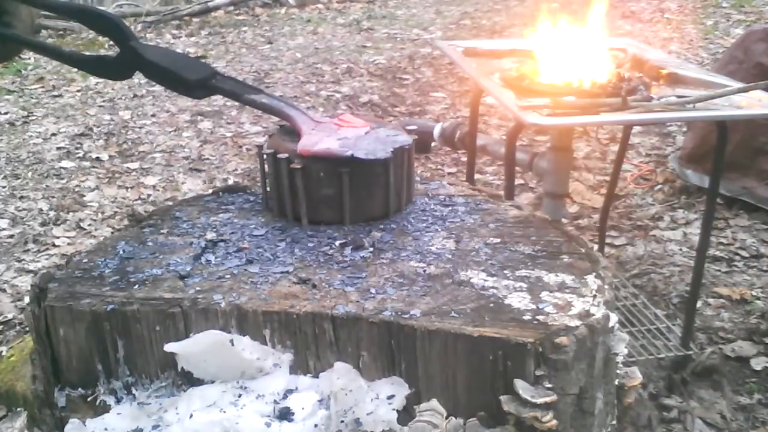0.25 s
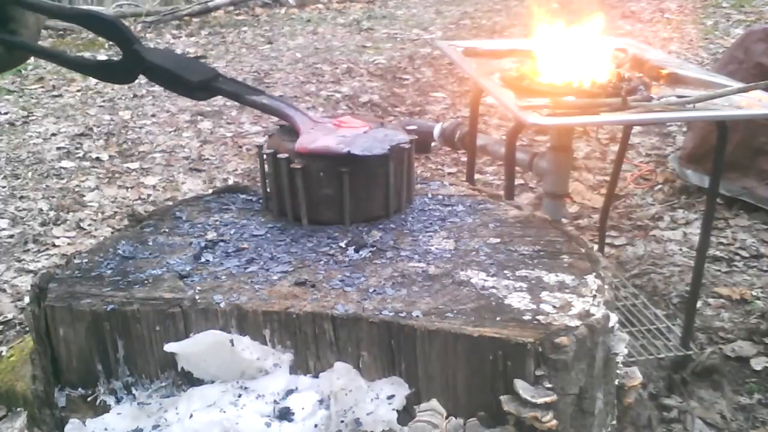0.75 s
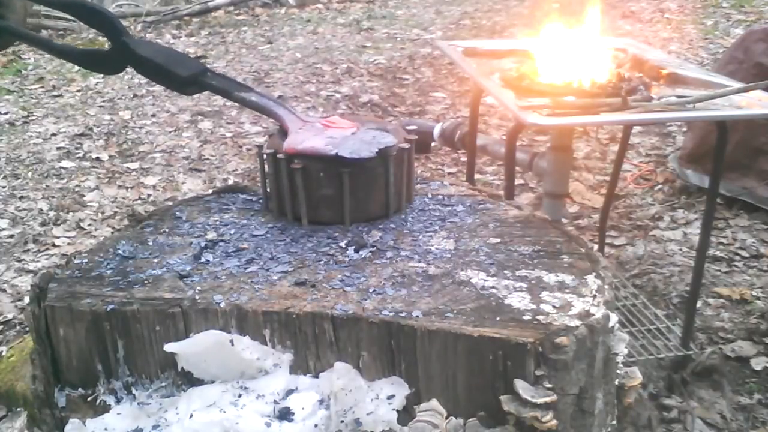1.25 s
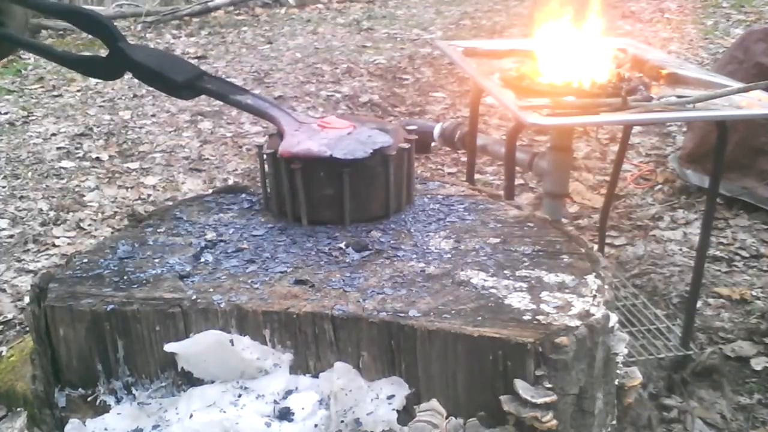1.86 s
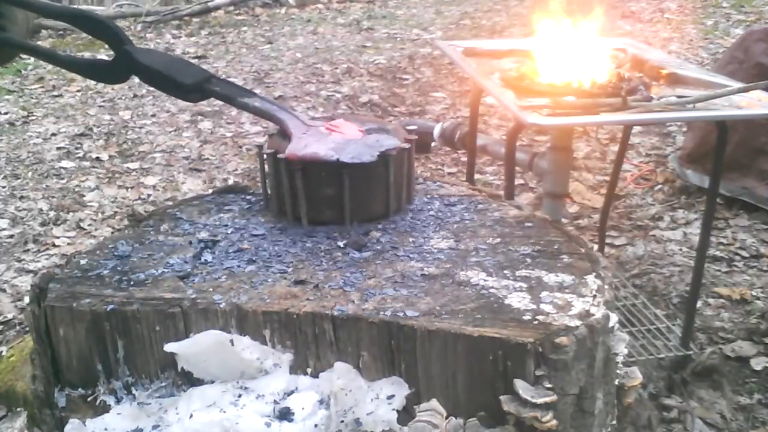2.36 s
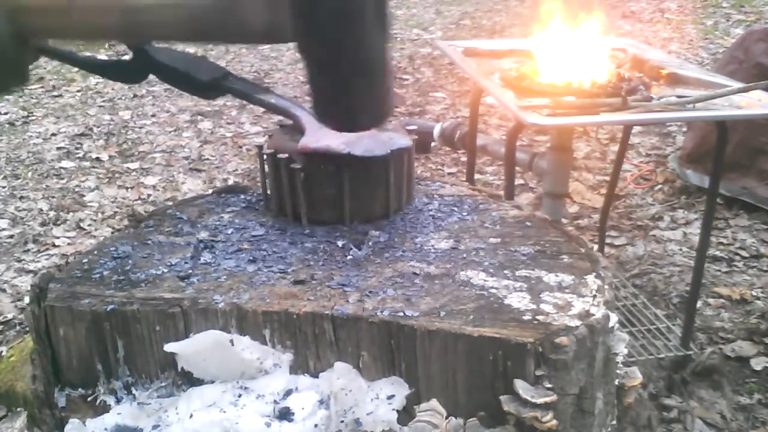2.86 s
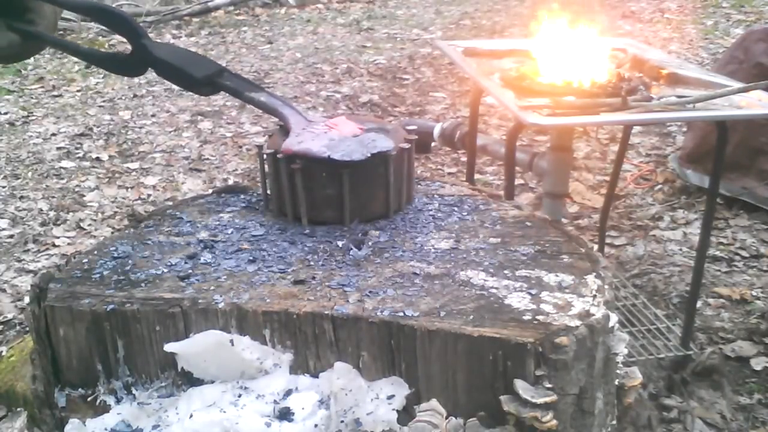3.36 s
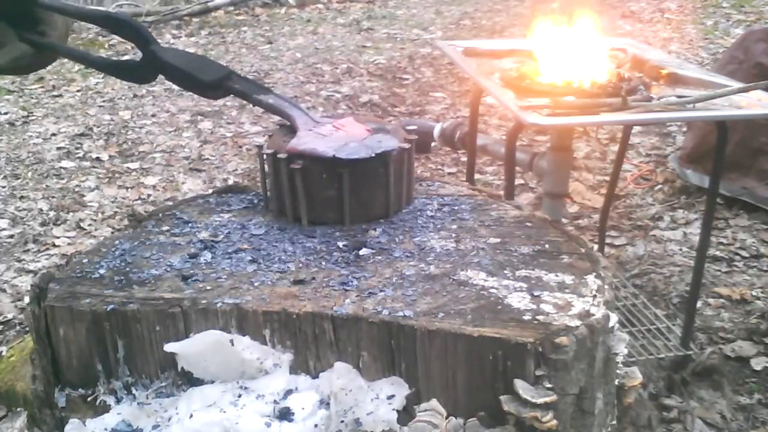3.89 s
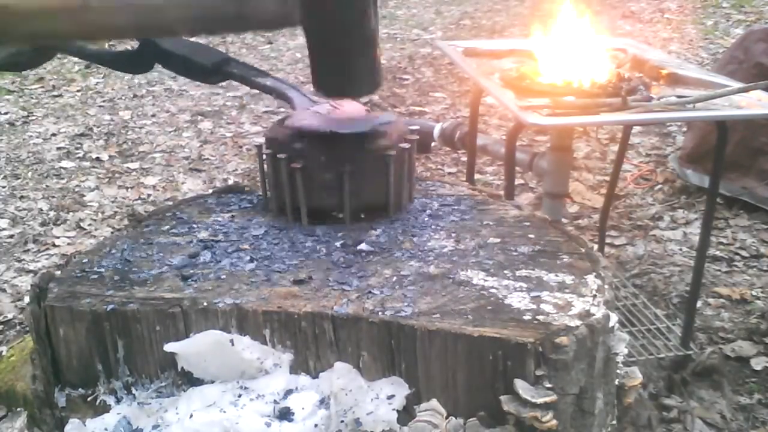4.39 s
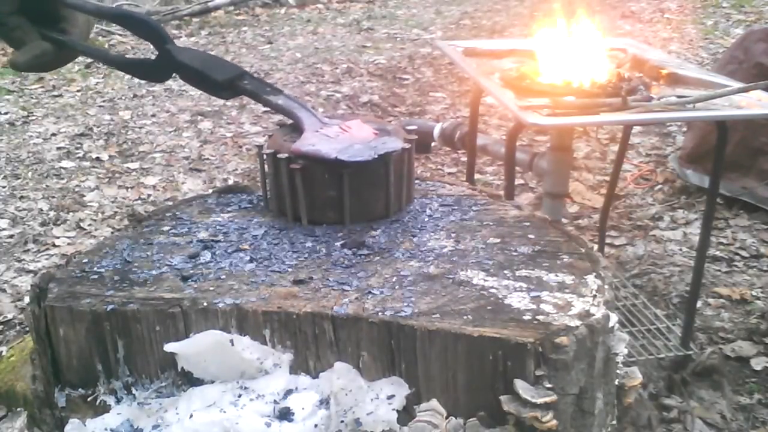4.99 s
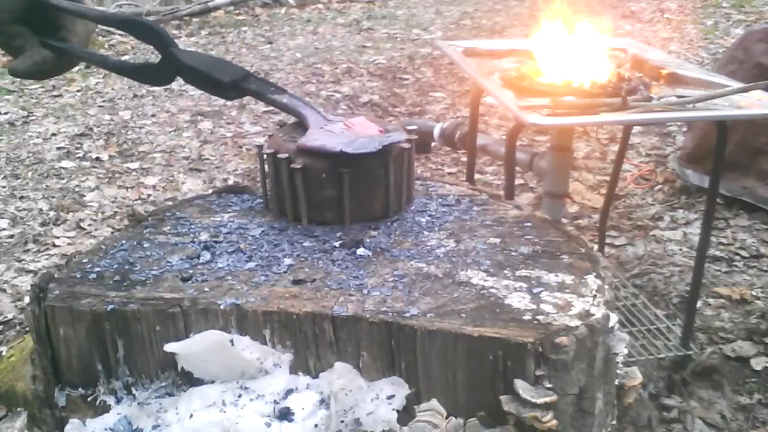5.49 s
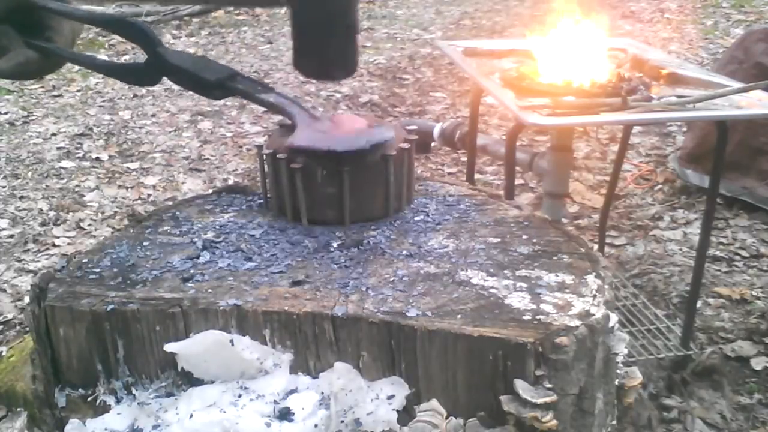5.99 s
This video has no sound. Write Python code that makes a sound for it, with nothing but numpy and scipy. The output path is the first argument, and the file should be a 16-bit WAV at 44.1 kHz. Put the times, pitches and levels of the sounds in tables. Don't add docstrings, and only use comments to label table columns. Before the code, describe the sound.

Outdoors in woodland, close microphones catch the fading end of one hammer blow, then eight more at about three-quarter-second intervals. Each is a short, clipped crash of steel and wood with a thin high ring from the hammer head and a quick scattered echo from trees. Tongs and work knock and clink between blows. A soft forge fire roars steadily, popping, with a faint blower hum.

```python
import sys
import numpy as np
from scipy import signal
from scipy.fft import rfft, irfft
from scipy.io import wavfile
from scipy.ndimage import uniform_filter1d, minimum_filter1d, map_coordinates

SR = 44100
rng = np.random.default_rng(int(sys.argv[2]) if len(sys.argv) > 2 else 0)


def elevation(decibels):
    levels = np.asarray(decibels, float)
    return 10 ** (levels / 20)


def master_out(mix):
    frames = np.transpose(np.atleast_2d(mix))
    ceiling = np.clip(frames, -1, 1)
    pcm = np.round(ceiling * 32767).astype(np.int16)
    wavfile.write(sys.argv[1], SR, pcm)


N = 275184
LEAD = SR // 10

# start in seconds, strength in dB, stump share in dB,
# crash in dB, echo in dB.
BLOW_BEFORE = [
    (-0.036, 2.5, 12, 5, -27.5),
]
BLOWS = [
    (0.59, 7, 4, -1, -26),
    (1.351, 12.4, 1, -3, -21.5),
    (2.098, 12.4, 1, 0, -21),
    (2.856, 12.9, -1.5, 0.5, -18),
    (3.642, 10.9, -3, 0.5, -18),
    (4.415, 14.6, -3.5, -1, -16),
    (5.209, 18.1, -14.5, -2.5, -16),
    (6.006, 13.9, -3.5, -3, -16.5),
]
# lower ring in dB, broad pair in dB, top ring in dB.
HEAD_LEVELS = [(-30, -36, -32), (-43, -42, -27), (-22, -42, -19), (-39, -28, -54), (-33, -17, -9),
               (-10.5, -19, 3), (-25, -39, -25), (-11, -38, -4), (-48, -20, -8)]
# left level in dB, right level in dB, then the seconds
HEAD_TONES = [(-26.5, -33, 0.15, 0.16), (-44, -51, .14, 0.16), (-27.5, -29, 0.13, 0.035),
              (-17.5, -31, 0.15, 0.29), (-19, -21.5, 0.16, 0.19), (-11, -19.5, 0.16, 0.029),
              (-11, -28, 0.16, 0.11), (-10, -20.5, 0.17, 0.16), (-27, -40, 0.184, 0.23)]
# pitch in Hz, t60 in seconds, right-hand gain, right-hand lag in radians.
HEAD_MODES = [(10070, .17, .6, .5), (12300, .2, .9, 2), (12600, .2, .9, 2), (14125, .14, 1.7, 2.2)]
HEAD_FADE = [134, 90]
# pitch in Hz, level in dB, t60 in seconds.
STUMP_MODES = [(94.7, -24.5, 0.22), (148, -19, 0.15), (256.7, -12, 0.12), (473.4, 3.5, 0.044),
               (581, 3.5, 0.053), (647.5, 3, 0.054)]
# pitch in Hz, level in dB, t60 in seconds.
STEEL_MODES = [(795, -1, 0.034), (983.4, 10, 0.033), (1077, 3, 0.029), (1280, 6, 0.024),
               (1771, -3.5, 0.047), (2011, -0.5, 0.057), (2150, -19.5, 0.15), (3138, -1.5, 0.065),
               (3205, -12, 0.097), (3473, -8.5, 0.075), (5105, -3, 0.038)]
# frequency in Hz, density in dB per Hz.
CRASH_COLOUR = [(30, -43), (120, -31), (300, -1), (600, -4), (1000, 2), (1600, -8.5), (2000, 0.5),
                (2500, -8.5), (3400, -5.5), (8000, -24.5), (14300, -23), (15000, -60.5), (22000, -82)]
# frequency in Hz, t60 in seconds.
CRASH_T60 = [(60, 0.13), (250, 0.058), (600, 0.071), (1200, 0.053), (2500, 0.06), (4000, 0.06),
             (14000, 0.09)]
# frequency in Hz, density in dB per Hz.
TREES_COLOUR = [(60, -31), (120, -4.5), (500, -3), (1500, -11), (2000, -11.5), (3500, -11), (8000, -10),
                (13000, -31), (14500, -20), (15000, -88)]
# frequency in Hz, t60 in seconds.
TREES_T60 = [(200, 0.55), (600, 0.53), (1500, 0.65), (2030, 0.96), (2600, 0.73), (3350, 0.73), (4500, 0.63),
             (10000, 0.32)]
# pitch in Hz, width in Hz, level in dB.
ECHO_RESONANCES = [(477, 120, 5), (1120, 240, 5.5), (1930, 200, 6.5), (3320, 450, 7.5), (3930, 250, -16),
                   (5000, 280, 1)]
# frequency in Hz, left-right likeness from -1 to 1.
ALIKE_NEAR = [(100, 1), (1000, 0.22), (3000, 0.098), (10000, 0.041)]
# frequency in Hz, left-right likeness from -1 to 1.
ALIKE_FAR = [(60, 0.97), (180, 0.92), (550, 0.81), (1650, 0.056), (4970, -0.12), (15000, -0.026)]
# frequency in Hz, density in dB per Hz.
FIRE_COLOUR = [(15, -98), (25, -40), (99, -10), (289, -9.5), (330, -4), (432, -7.5), (494, -6.5), (917, -9),
               (1110, -13.5), (1270, -14.5), (1490, -16), (3160, -26.5), (13100, -39), (15400, -29.5)]
# pitch in Hz, wander in Hz, level in dB.
BLOWER_TONES = [(302, 11.46, -66.5), (509, 5.6, -55), (1101, 2.75, -55.5)]
# start in seconds, peak in dB, pitch in Hz, left-right balance in dB.
POPS = [(0.1373, -29, 3520, 4), (0.2647, -33.5, 4470, -4), (0.3087, -41, 2520, -5), (0.93, -34, 4700, -7),
        (1.0191, -37, 2400, -8), (1.1792, -48, 2300, -4), (1.2034, -26.5, 2930, -4), (1.281, -41, 2390, -1),
        (1.3244, -52, 2790, -5.5), (1.586, -39, 10900, -4), (4.318, -38, 4530, -2), (1.846, -42, 4100, -7),
        (1.9035, -36, 2900, -3), (2.3344, -38, 11000, 0), (2.653, -36.5, 3500, 0),
        (2.7057, -40.5, 3420, -1), (2.733, -36, 2430, 1), (2.811, -40, 6500, 0), (3.2884, -39, 2750, 5),
        (3.3857, -37, 4530, -4), (3.9615, -35, 3180, 0), (4.15, -42, 6500, 4), (4.239, -40, 7500, 0),
        (4.3048, -20, 1900, 3), (4.339, -37, 3000, 3), (4.366, -44, 3700, -6), (4.8718, -39, 2300, 5),
        (5.1532, -35.5, 4100, -3), (5.6733, -38, 3320, -0.5), (5.837, -32.5, 3610, -3)]
# start in seconds, peak in dB, pitch in Hz.
KNOCKS = [(0.645, -19, 485), (0.759, -25, 380), (1.404, -11, 487), (1.447, -10.5, 484), (1.49, -25, 710),
          (2.149, -18, 490), (2.169, -17.5, 970), (2.909, -10.5, 493), (3.694, -25, 480), (3.719, -36, 503),
          (5.284, -14, 345), (6.081, -8.5, 450), (6.099, -18, 925)]
# start in seconds, peak in dB, pitch in Hz.
THUDS = [
    (3.752, -30, 125),
    (4.497, -24.5, 141),
    (5.285, -29, 148),
    (6.129, -25, 140),
]
# start in seconds, peak in dB, pitch in Hz.
CLINKS = [
    (.638, -21, 5000),
    (1.449, -21, 3820),
    (2.9134, -9.5, 1500),
    (2.915, -14, 3900),
    (3.775, -34, 3080),
    (4.4687, -8, 4800),
    (4.4946, -11, 3700),
    (5.256, -7.5, 5500),
    (5.423, -30.5, 4870),
    (6.0693, -4.5, 3930),
]
# start in seconds, peak in dB, first pitch in Hz,
# last pitch in Hz, length in seconds.
SLIDE = (1.43, -23.5, 1350, 480, .024)


def unit(x):
    return x / np.sqrt(np.mean(x ** 2) + 1e-20)


def along(points, hz):
    f, v = np.transpose(points)
    return np.interp(np.log(hz + 1), np.log(f + 1), v)


def wobble(rate, size=N):
    knots = rng.standard_normal(int(size * rate / SR) + 4)
    return map_coordinates(knots, [np.arange(size) * rate / SR])


def noise(size, gain, alike, t60=None, patchy_db=0):
    hz, t, z = signal.stft(rng.standard_normal((2, size)), SR, nperseg=256)
    patches = uniform_filter1d(rng.standard_normal(z.shape[1:]), size=4, axis=0)
    patches = uniform_filter1d(patches, size=5, axis=1)
    pair = signal.istft(z * elevation(patchy_db * unit(patches)), SR, nperseg=256)[1][:, :size]
    f = np.fft.rfftfreq(size, 1 / SR)
    turn = np.arccos(np.clip(along(alike, f), -1, 1)) / 2
    mid, side = irfft(rfft(pair) * gain(f) * [np.cos(turn), np.sin(turn)], size)
    pair = unit(np.array([mid + side, mid - side]))
    if t60:
        z = signal.stft(pair, SR, nperseg=256)[2]
        decay = elevation(-60 * t / along(t60, hz)[:, None])
        pair = signal.istft(z * decay, SR, nperseg=256)[1][:, :size]
    return pair


def add(track, s, sound):
    part = track[:, LEAD + round(s * SR):][:, :sound.shape[1]]
    part += sound[:, :part.shape[1]]


def ringing(modes, t, turn):
    scatter_db, detune = 1.2, 0.007
    total = 0
    for hz, db, t60 in modes:
        strength, pitch, phase = rng.standard_normal(), rng.standard_normal(), rng.standard_normal((2, 1))
        level = elevation(db + scatter_db * strength - 60 * t / t60)
        total = total + level * np.sin(2 * np.pi * hz * (1 + detune * pitch) * t + turn * phase)
    return total


def head_rings(levels, t):
    lower_db, broad_db, top_db = levels
    drift = 0.47 * np.cumsum(rng.standard_normal((len(HEAD_MODES), len(t))), axis=1) / np.sqrt(SR / 20)
    ring = 0
    for (hz, t60, right, lag), db, d in zip(HEAD_MODES, [lower_db, broad_db, broad_db, top_db], drift):
        wave = np.sin(2 * np.pi * hz * t + d - [[0], [lag]])
        ring = ring + elevation(db - 60 * t / t60) * [[1], [right]] * wave
    return ring * elevation(2 * wobble(50, size=len(t))) * (1 - np.exp(-t / 0.0019))


def head_tone(row, t):
    lift_s, top_s = 0.3, 0.29
    db, dip_s = np.reshape(row, (2, 2, 1))
    fringe_s, stump_share = np.array([[.14, .24], [.6, .4]])[..., None]
    hz = 10915 + 45 * np.cos(np.pi * np.minimum(t / lift_s, 1))
    paths = 1 - stump_share * np.exp(2j * np.pi * (t - dip_s) / fringe_s)
    paths = paths + 0.33 * np.exp(2j * np.pi * (t / 0.037 + rng.random((2, 1))))
    shake_db = 1.5 * np.array([wobble(45, size=len(t)), wobble(46, size=len(t))])
    fade_db = np.array(HEAD_FADE)[:, None] * t
    turn_db = 400 * np.maximum(t - top_s, 0)
    level = elevation(db + 3 + shake_db - fade_db - turn_db) * np.minimum(1, t / 0.014)
    return level * np.real(paths * np.exp(2j * np.pi * np.cumsum(hz) / SR - [[0], [1.5j]]))


def anvil_gain(hz):
    return 1 + sum(elevation(db) * w / np.hypot(w, 2 * (hz - c)) for c, w, db in ECHO_RESONANCES)


def tree_answer(t):
    colour = lambda hz: elevation(along(TREES_COLOUR, hz)) * anvil_gain(hz)
    echo = noise(len(t), colour, ALIKE_FAR, TREES_T60, patchy_db=1)
    return echo * (1 - np.exp(-t / 0.003))


def hammer():
    track = np.zeros((2, LEAD + N))
    long = np.arange(3 * SR // 4) / SR
    t = long[:SR // 2]
    lead_in = t[:SR // 300]
    for blow_row, levels, tone_row in zip(BLOW_BEFORE + BLOWS, HEAD_LEVELS, HEAD_TONES):
        s, db, wood_db, crash_db, echo_db = blow_row
        steel = ringing(STEEL_MODES, t, turn=0.67)
        stump = ringing(STUMP_MODES, t, turn=0.26) * (1 - np.exp(-t / 0.0017))
        body = steel + elevation(wood_db) * stump
        crash = elevation(crash_db) * noise(len(t), lambda hz: elevation(along(CRASH_COLOUR, hz)), ALIKE_NEAR, CRASH_T60)
        blow = elevation(db) * (elevation(-10.5) * body + crash) * (1 - np.exp(-t / 0.00034))
        add(track, s + .0005, blow + head_rings(levels, t) + head_tone(tone_row, t))
        add(track, s, elevation(echo_db) * tree_answer(long))
        add(track, s - lead_in[-1], elevation(-37 + 430 * lead_in) * rng.standard_normal((2, len(lead_in))))
    return track[:, LEAD:]


def burst(hz, t60, spread, alike, steep=1):
    t = np.arange(SR // 16) / SR

    def band(f):
        octaves = np.log2(f / hz + 0.011) / spread
        return 1 / (1 + np.where(f < hz, steep, 1) ** 2 * octaves ** 2)

    return noise(len(t), band, [(hz, alike)]) * elevation(-60 * t / t60) * (1 - np.exp(-t * hz / 0.62))


def fire():
    level_db = -40.5 + 1.2 * wobble(2.773) + 0.27 * wobble(24)
    return elevation(level_db) * noise(N, lambda hz: elevation(along(FIRE_COLOUR, hz)), ALIKE_FAR, patchy_db=1)


def blower():
    total = 0
    for hz, wander_hz, db in BLOWER_TONES:
        level = elevation(db + 3.5 + 3.1 * wobble(26))
        total = total + level * np.sin(2 * np.pi * np.cumsum(hz + wander_hz * wobble(13)) / SR)
    return total


def coals():
    track = np.zeros((2, LEAD + N))
    pop_t60 = 0.0089
    for s, db, hz, pan_db in POPS:
        sides = elevation([[db + pan_db / 2], [db - pan_db / 2]])
        add(track, s, sides * burst(hz, pop_t60, spread=0.83, alike=0.43, steep=3.4))
    for when, loud, pitch in rng.random((45, 3)):
        spit = burst(7000 * 2 ** (pitch - .5), pop_t60, spread=0.44, alike=0.32)
        add(track, when * N / SR, elevation(-49 + 7.1 * loud) * spit)
    return track[:, LEAD:]


def knock(hz, t60):
    t = np.arange(SR // 16) / SR
    return np.sin(2 * np.pi * hz * t - [[0], [.3]]) * elevation(-60 * t / t60) * (1 - np.exp(-t * hz / 1.26))


def bounces():
    track = np.zeros((2, LEAD + N))
    t = np.arange(SR // 4) / SR
    knock_t60, thud_s = 0.042, 0.024
    for s, db, hz in KNOCKS:
        rattle = burst(hz, knock_t60, spread=0.69, alike=0.74)
        add(track, s, elevation(db - 5) * (knock(hz, knock_t60) + 0.5 * rattle))
    for s, db, hz in THUDS:
        swell = np.sin(np.pi * np.minimum(t / thud_s, 1))
        add(track, s, elevation(db) * swell * np.sin(2 * np.pi * hz * t - [[0], [.3]]))
    for s, db, hz in CLINKS:
        add(track, s, elevation(db - 8) * burst(hz, t60=0.024, spread=0.33, alike=.6))
    return track[:, LEAD:]


def skid():
    track = np.zeros((2, LEAD + N))
    t = np.arange(SR // 4) / SR
    s, db, from_hz, to_hz, length_s = SLIDE
    u = np.minimum(t / length_s, 1)
    phase = 2 * np.pi * np.cumsum(from_hz * (to_hz / from_hz) ** u) / SR
    add(track, s, elevation(db) * np.sqrt(np.abs(np.sin(np.pi * u)) ** 2) * np.sin(phase - [[0], [.3]]))
    return track[:, LEAD:]


def scrape():
    track = np.zeros((2, LEAD + N))
    t = np.arange(SR // 4) / SR
    stroke = np.interp(t, np.cumsum([0, 0.065, 0.066, .015]), [0, 1, 1, 0])
    colour = lambda hz: 1 / np.hypot(1, np.log2(hz / 4000 + .01) / 0.54) ** 2
    grind = noise(len(t), colour, ALIKE_FAR, patchy_db=1.0)
    add(track, 3.0, elevation(-40 + 1.2 * wobble(91, size=len(t))) * stroke * grind)
    return track[:, LEAD:]


def scene():
    return hammer() + fire() + blower() + coals() + bounces() + skid() + scrape()


def thin_treble(x):
    hz, t, z = signal.stft(x, SR, nperseg=256)
    power = uniform_filter1d(np.abs(z) ** 2, size=3, axis=1)
    band = uniform_filter1d(power, size=6, axis=2)
    high_tone = band[:, hz > 9000].max(axis=(0, 1))
    coming = -minimum_filter1d(-power.sum(axis=(0, 1)), size=5, origin=-2)
    blocks = rng.random((z.shape[1] // 4 + 1, z.shape[2] // 12 + 1)) < .22
    spared = np.kron(blocks, np.ones((4, 12), bool))[:z.shape[1], :z.shape[2]]
    beside = (hz[:, None] > 8800) & (high_tone > elevation(-112)) & (band < elevation(-138)) & ~spared
    before = (hz[:, None] > 2800) & (power < coming * elevation(-120))
    above = (hz[:, None] > 14550) & (power < elevation(-100))
    return signal.istft(z * ~(beside | before | above), SR, nperseg=256)[1][:, :N]


def low_pass(x):
    return signal.sosfilt(signal.butter(12, 15590, fs=SR, output="sos"), x)


def record(dry):
    clipped = dry / (1 + np.abs(dry / .96) ** 14) ** (1 / 14)
    low_cut = signal.butter(2, 35, "high", fs=SR, output="sos")
    mix = thin_treble(signal.sosfilt(low_cut, clipped))
    return low_pass(mix)


dry = scene()
out = record(dry)
master_out(out)
```